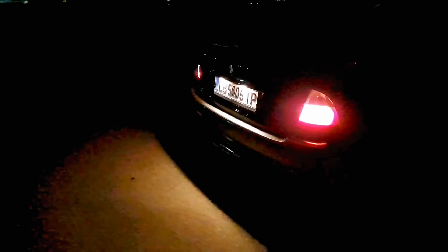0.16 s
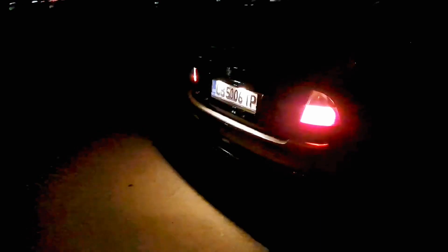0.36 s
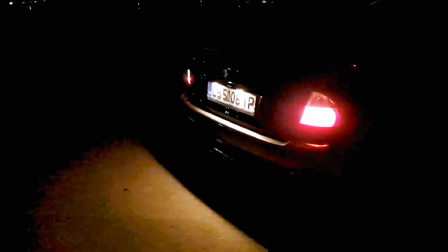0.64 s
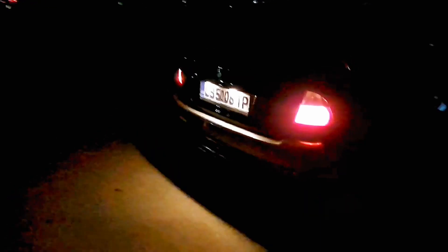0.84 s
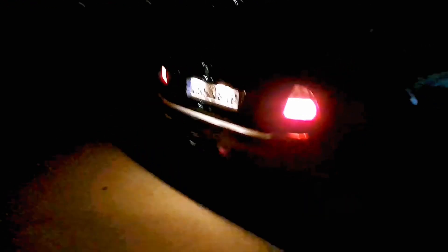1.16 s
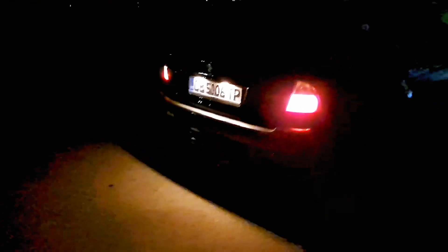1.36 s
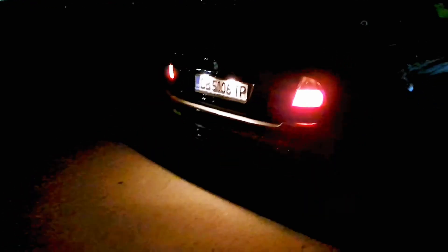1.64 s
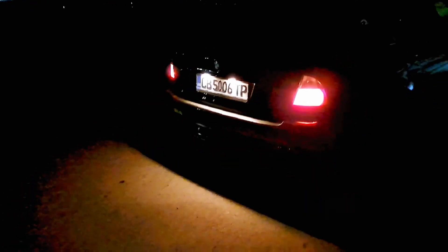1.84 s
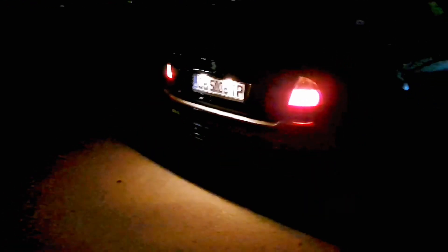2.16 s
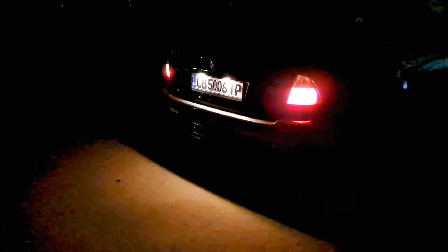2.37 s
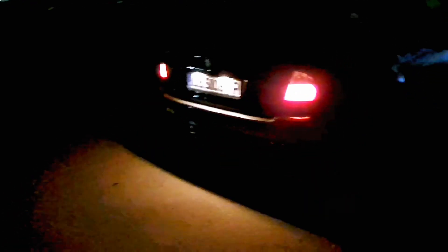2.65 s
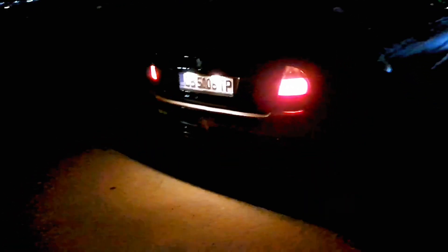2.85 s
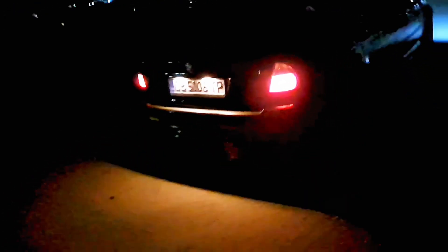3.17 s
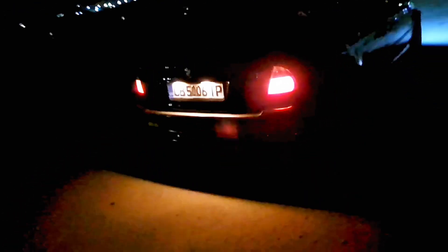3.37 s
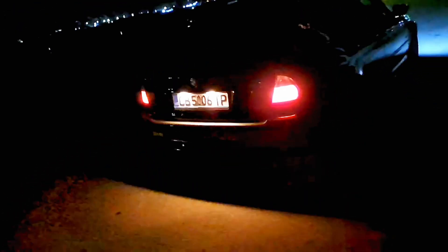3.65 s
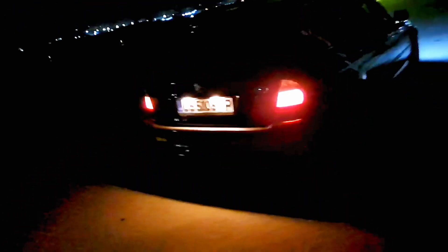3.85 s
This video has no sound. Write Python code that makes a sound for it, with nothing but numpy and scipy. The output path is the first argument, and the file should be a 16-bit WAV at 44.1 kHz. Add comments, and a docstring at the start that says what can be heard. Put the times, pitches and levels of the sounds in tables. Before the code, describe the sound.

A six-cylinder car revs and drops at its tailpipe, with loud paired backfire bangs between throaty growls

```python
"""Six-cylinder car backfiring at its tailpipe

The revs sink, are blipped up to a stuttering limiter and sink again; on each fall unburnt fuel explodes
in sharp bangs. Sines locked to the crank make the engine, and noise shaped by the pipe its rumble.
Bangs and misfires ring decaying pipe modes, with bursts of noise for cracks, sizzle and spits.
Filtered noise that throbs with the firings is gas hissing from the pipe; walls echo the explosions faintly."""
import sys
import numpy as np
from scipy import signal
from scipy.fft import rfft, irfft
from scipy.io import wavfile
from scipy.ndimage import uniform_filter1d

SR = 44100
rng = np.random.default_rng(int(sys.argv[2]) if len(sys.argv) > 2 else 0)


def log_audio(samples):
    """Write samples as a 16-bit WAV file to the path given in sys.argv[1]."""
    # one column per channel
    frames = np.atleast_2d(samples).T
    # limit to full scale, then quantise
    limited = np.clip(frames, -1, 1)
    pcm = np.round(limited * 32767).astype(np.int16)
    wavfile.write(sys.argv[1], SR, pcm)


N = 176400
TIME = np.arange(N) / SR
BINS_HZ = np.maximum(np.arange(N // 2 + 1) * SR / N, 1)

# misfires at the rev limiter, each a gap in the firing that ends in a thud:
# (time [s], thud level [dB], gap before it [s])
MISFIRES = [(1.744,-16.5,0.0024),(1.792,-18,0.04),(1.84,-12.5,0.0086),(1.893,-14,0.033),(1.948,-17,0.04695),(1.99,-12,0.011),(2.082,-9.5,.027),(2.159,-15,0.036),(2.243,-9.5,0.0185),(2.281,-7.5,0.035),(2.663,-8,0.0388),(2.765,-17,0.011)]
PORT_LAG_S, DIFFUSE_SHARE = 0.00018, 0.73  # later arrival at the right port; scattered share of noise power
TAIL_DB = -16  # faint tail of cracks and spits, relative to their onset


def from_db(db):
    """Amplitude ratio from decibels: 20 dB is a factor of ten."""
    return 10 ** (np.asarray(db) / 20)


def rms_one(x):
    """Normalization: equal mean power, here unit rms."""
    return x / np.sqrt(np.mean(x ** 2) + 1e-20)


def in_time(rows):
    """Linear interpolation: each column of a time curve at every sample."""
    s, *columns = np.transpose(rows)
    return [np.interp(TIME, s, column) for column in columns]


def gain_at(points, hz):
    """Frequency response: decibels interpolated over log frequency, returned as gain."""
    at_hz, db = np.transpose(points)
    return from_db(np.interp(np.log(hz), np.log(at_hz), db))


def colour(x, gain):
    """Linear filtering: the spectrum is multiplied by a gain per frequency."""
    return irfft(rfft(x) * gain, N)


def drift(rate_hz):
    """Low-passed random process: white noise through two equal poles at rate_hz, scaled to unit rms."""
    step = 40  # samples between computed values
    pole = np.exp(-2 * np.pi * rate_hz * step / SR)
    settling = 2000
    white = rng.standard_normal(N // step + settling + 2)
    slow = signal.lfilter([1], [1, -2 * pole, pole * pole], white)[settling:]
    return np.interp(np.arange(N) / step, np.arange(len(slow)), rms_one(slow))


def delayed(x, s):
    """Propagation delay: the same waveform s seconds later."""
    return np.interp(TIME - s, TIME, x, left=0)


def at_ports(x):
    """Arrival-time difference: direct sound reaches the left port first."""
    return np.array([x, delayed(x, PORT_LAG_S)])


def spread(three):
    """Partial coherence: one noise reaches both ports directly, two more are scatter from ground and body."""
    direct = np.array([three[0], np.roll(three[0], int(PORT_LAG_S * SR))])
    return np.sqrt(1 - DIFFUSE_SHARE) * direct + np.sqrt(DIFFUSE_SHARE) * three[1:]


def dying(age, t60):
    """Exponential decay: 60 dB down after t60 seconds, level before age zero."""
    return np.exp(-np.log(1000) * np.maximum(age, 0) / t60)


def ring(hits, modes, vary_db):
    """Modal resonance: each hit (s, dB) pushes, then pulls every mode, with a random strength per mode."""
    swing_s = 0.0015  # from push to pull
    s, db, *_ = np.transpose(hits)
    strengths = rng.standard_normal((len(s), len(modes))).T
    out = np.zeros(N)
    for (hz, mode_db, t60), chance in zip(modes, strengths):
        clicks = np.full(N, 1e-18)  # a tiny floor keeps the filter's numbers normal
        clicks[(s * SR).astype(int)] = from_db(db + mode_db + vary_db * chance)
        radius, angle = from_db(-60 / (t60 * SR)), 2 * np.pi * hz / SR
        resonator = [1, -2 * radius * np.cos(angle), radius * radius]
        out += signal.lfilter([0, np.sin(angle)], resonator, clicks)
    return out - delayed(out, swing_s)


def ragged(axis, step, depth_db, size):
    """Random modulation: gains drawn in decibels at every step along time or frequency."""
    knots = rng.standard_normal(size // 16)
    wander = np.interp(axis / step, np.arange(len(knots)), knots)
    return from_db(depth_db * np.clip(wander, -2, 2))


def bursts(hits, spectrum, tail_db, size=16384):
    """Turbulent jets (s, dB, tilt dB per octave, hold s): noise with a fast rise, hold, fall and faint tail."""
    rise_s, fall_t60_s, tail_t60_s = 0.00071, 0.052, 0.37
    ripple_hz, ripple_db = 130, 5  # unevenness of each jet's spectrum
    crackle_s, crackle_db = .0012, 3.5  # unevenness in time
    age, hz = np.arange(size) / SR, np.maximum(np.arange(size // 2 + 1) * SR / size, 1)
    tint = gain_at(spectrum, hz)
    octaves = np.log2(np.clip(hz, 800, 6000))
    tail = from_db(tail_db) * dying(age, tail_t60_s)
    out = np.zeros((2, N + size))
    for s, db, tilt_db, hold in hits:
        own = from_db(tilt_db * octaves) * ragged(hz, ripple_hz, ripple_db, size)
        white = spread(rng.standard_normal((3, size)))
        noise = rms_one(irfft(rfft(white) * tint * own))
        shape = np.minimum(age / rise_s, 1) * (dying(age - hold, fall_t60_s) + tail)
        shape = shape * ragged(age, crackle_s, crackle_db, size)
        start = int(s * SR)
        out[:, start:start + size] += from_db(db) * shape * noise
    return out[:, :N]


def engine(speed, turns, cut):
    """Harmonic orders: three firings per turn and their octave, over a burble of other crank orders."""
    # level of the firing tone: (time [s], level [dB])
    firing_level = [(.04,-20.5),(.3,-23),(.74,-29.5),(.85,-64),(1.15,-31),(1.3,-38),(1.5,-29.5),(1.7,-24.5),(1.95,-21.5),(2.17,-11.5),(2.35,-15),(2.39,-30.5),(2.52,-21.5),(2.58,-14.5),(2.64,-17),(2.78,-21),(2.85,-13.5),(3.1,-20),(3.3,-25.5),(3.63,-26.5),(3.73,-42),(4,-54)]
    # level of its octave: (time [s], level [dB])
    octave_level = [(.04,-27),(.74,-25),(.85,-62),(1.122,-47),(1.24,-20.5),(1.42,-24),(1.5,-15.5),(1.72,-18.5),(1.85,-29.5),(2,-17),(2.4,-15.5),(2.49,-19.5),(2.58,-13),(2.68,-18.5),(2.9,-28.5),(3.1,-22.5),(3.63,-25.5),(3.73,-44),(4,-30)]
    # level of the burble from uneven cylinders: (time [s], level [dB])
    burble_level = [(.04,1.5),(.75,-2.5),(.86,-8.5),(1.15,-4),(1.3,-3),(1.7,-3.5),(2.2,3.5),(2.45,2),(2.9,-2),(3.3,2),(3.63,0.5),(3.73,-9),(4,-8.5)]
    # the burble's tones: (multiple of crank speed, level [dB])
    burble_orders = [(2,-34),(4,-40),(7,-36.5),(8,-30.5),(9,-28),(10,-33),(11,-40),(12,-28.5),(14,-34),(15,-31.5),(18,-27.5)]
    # response of the exhaust pipe: (frequency [Hz], gain [dB])
    pipe = [(20,-23),(45,-1.5),(66,5),(90,-7),(110,1.5),(142,3),(200,-5),(260,-5.5),(325,2),(385,-5),(450,-12),(540,-16.5),(750,-28.5),(1500,-63)]
    # low turbulence in the pipe: (time [s], level [dB])
    rumble_level = [(0,-35),(.75,-30),(.9,-38),(1.7,-34.5),(1.76,-28),(2.3,-23),(2.44,-28.5),(2.52,-28.5),(2.7,-22.5),(2.86,-36.5),(3.6,-37.5),(4,-33)]
    half_orders_db, gap_tone_db = -68, -8.5
    tone_waver_db, burble_waver_db = 1.36, 2.5  # rms level waver

    def tone(order, waver_db):
        """Phase locking: a sine at a multiple of the crank angle, wavering in level."""
        return np.sin(2 * np.pi * (order * turns + rng.random())) * from_db(waver_db * drift(9.1))

    firing = from_db(in_time(firing_level)[0]) * tone(3, tone_waver_db)
    firing = firing + from_db(in_time(octave_level)[0]) * tone(6, tone_waver_db)
    firing = firing * from_db(gap_tone_db * cut)
    orders = [(round(order), db) for order, db in burble_orders]
    orders += [(k + .5, half_orders_db) for k in range(1, 14)]
    burble = np.zeros(N)
    for order, db in orders:
        burble += from_db(db) * gain_at(pipe, order * speed) * tone(order, burble_waver_db)
    rumble = rms_one(colour(rng.standard_normal(N), gain_at(pipe, BINS_HZ)))
    burble = from_db(in_time(burble_level)[0]) * burble
    return at_ports(firing + burble + from_db(in_time(rumble_level)[0]) * rumble)


def limiter():
    """Interrupted excitation: how far the spark is cut (0-1), and the phase slip in turns after each gap."""
    edge_s, slip_turns = .008, .026  # smoothing of the edges; spread of the slip before smoothing
    cut, slip = np.zeros(N), np.zeros(N)
    for (s, _, gap), chance in zip(MISFIRES, rng.standard_normal(len(MISFIRES))):
        cut[(TIME > s - gap) & (TIME < s)] = 1
        slip[TIME > s] = slip_turns * chance
    return uniform_filter1d(np.array([cut, slip]), int(edge_s * SR))


def bangs():
    """Impulsive source: exploding fuel swings the pressure, rings the pipe, cracks and sizzles at the outlet."""
    # bangs: (time [s], thump level [dB], thump pitch [Hz], crack delay [s], crack level [dB],
    # sizzle level [dB], crack tilt [dB per octave], hold of crack and sizzle [s])
    explosions = [(.7628,0.5,268,0.0019,-14,-24.5,0.5,0.0014),(0.8207,-5,295,-0.0078,-23.5,-50,-0.5,0.0038),(1.0237,2.5,223,0,-20.5,-33.5,-2,0.0022),(1.0643,1,193,-0.0016,-24.5,-30.5,-1,0.0052),(1.139,-10,149,-.001,-42,-50,2,0.0073),(3.6391,0.5,247,.0035,-11,-30,-0.5,0.0017),(3.695,-13,270,-.0079,-24.5,-46,1.5,0.005),(3.9149,3,205.5,0.0014,-17.5,-36,-3,0.0071)]
    # the pipe's ring after a bang: (frequency [Hz], level [dB], t60 [s])
    pipe_modes = [(48.4,-12,0.14),(69.7,-10.5,0.09),(123,-13.5,0.045),(305.6,-17.5,0.042),(516,-26.5,0.039),(1032,-30.5,0.022)]
    # relative spectrum of the crack: (frequency [Hz], density [dB per Hz])
    crack_spectrum = [(300,12),(600,-1.5),(780,-5.5),(1100,3.5),(1700,-2.5),(3000,-8),(4600,-11),(5800,-15),(9000,-27),(16000,-26)]
    # relative spectrum of the sizzle: (frequency [Hz], density [dB per Hz])
    sizzle_spectrum = [(4000,-15),(8500,-7),(11500,-0.5),(15500,2.5)]
    thump_t60_s, thump_rise_s, sizzle_tail_db = 0.026, 0.0032, -24
    thumps = ring(explosions, pipe_modes, vary_db=0.5)
    cracks, sizzles = [], []
    for s, thump_db, hz, lag, crack_db, sizzle_db, tilt_db, hold in explosions:
        age = np.maximum(TIME - s, 0)
        envelope = dying(age, thump_t60_s) * (1 - np.exp(-age / thump_rise_s))
        thumps += from_db(thump_db) * np.sin(2 * np.pi * hz * age) * envelope
        cracks.append((s + lag, crack_db, tilt_db, hold))
        sizzles.append((s + lag, sizzle_db, 0, hold))
    crack = bursts(cracks, crack_spectrum, TAIL_DB)
    sizzle = bursts(sizzles, sizzle_spectrum, sizzle_tail_db)
    return at_ports(thumps) + crack + sizzle


def misfires():
    """Damped resonance: small charges deep in the silencer thud dully; a few reach the outlet and spit."""
    # the pipe's ring after a misfire: (frequency [Hz], level [dB], t60 [s])
    thud_modes = [(68,3,0.19),(112,-2.5,0.07),(184,-7,0.11),(262,-15,0.041),(400,-20,.045)]
    # burning fuel spits from the outlet: (time [s], level [dB], hold [s])
    spits = [(1.823,-42,0.0077),(1.955,-33.5,0.023),(2.214,-34,0.011),(2.289,-34,0.0095)]
    # relative spectrum of a spit: (frequency [Hz], density [dB per Hz])
    spit_spectrum = [(1200,5),(4500,-12),(8500,-23),(13000,-15)]
    spit = bursts([(s, db, 0, hold) for s, db, hold in spits], spit_spectrum, TAIL_DB)
    return at_ports(ring(MISFIRES, thud_modes, vary_db=0.4)) + spit


def cycle_grit(size):
    """Periodic noise: three noises one engine cycle long, in which some overtones stand out."""
    uneven_db = 4.0
    overtones = rfft(rng.standard_normal((3, size)))
    chance = np.clip(rng.standard_normal(size // 2 + 1), -2, 2)
    return irfft(overtones * from_db(uneven_db * chance))


def gas_hiss(turns, size=2048):
    """Modulated jet noise: hiss throbs with the firings, and part repeats every two-turn engine cycle."""
    # gas rushing from the tailpipe: (time [s], level [dB], top-octave gain [dB])
    flow = [(.04,-35.5,5.5),(.4,-38,6),(.75,-41,3.5),(.9,-49.5,-2),(1.2,-51.5,1),(1.35,-44,7),(1.7,-36.5,2.5),(1.9,-37.5,2.5),(2.3,-31.5,2),(2.55,-31.5,.5),(2.85,-34,-4),(3.3,-39,-.5),(3.62,-38.5,-1.5),(3.8,-50,-12),(4,-47.5,0)]
    # relative spectrum of the hiss: (frequency [Hz], density [dB per Hz])
    hiss_spectrum = [(560,-2.5),(760,-9.5),(1000,-4),(1300,-5.5),(1700,-9.5),(2400,-11),(3300,-15.5),(5100,-20.5),(5600,-25.5),(8800,-34),(11500,-27.5),(15500,-28.5)]
    low_hz, top_hz = 500, 8700  # lower roll-off; start of the top octave
    rasp_share, throb_depth, sputter_db = .58, 0.024, .7  # share of power that repeats; depth; rms waver
    flow_db, top_db = in_time(flow)
    place = turns / 2 % 1 * size
    cycle = rms_one(np.array([np.interp(place, np.arange(size), grit) for grit in cycle_grit(size)]))
    fresh = rng.standard_normal((3, N))
    noise = spread(np.sqrt(rasp_share) * cycle + np.sqrt(1 - rasp_share) * fresh)
    noise = rms_one(colour(noise, gain_at(hiss_spectrum, BINS_HZ) / (1 + (low_hz / BINS_HZ) ** 4)))
    top = colour(noise, 1 / (1 + (top_hz / BINS_HZ) ** 6))
    throb = 1 + throb_depth * np.sin(2 * np.pi * 3 * turns)
    level = from_db(flow_db + sputter_db * drift(85))
    return level * throb * (noise + (from_db(top_db) - 1) * top)


def walls(x):
    """Discrete reflection: a few delayed, low-passed copies return from alternating sides."""
    # reflections: (delay [s], level [dB])
    echoes = [(.021,-29),(.034,-27),(.087,-28)]
    low_pass = signal.butter(2, 3100, fs=SR, output="sos")
    dull = signal.sosfilt(low_pass, x.mean(axis=0))
    out = np.zeros((2, N))
    for k, (s, db) in enumerate(echoes):
        out[k % 2] += from_db(db) * delayed(dull, s)
    return out


def scene():
    """Superposition: engine speed drives tones and hiss; explosions and their echoes lie on top."""
    # crankshaft speed: (time [s], speed [turns per second])
    crank_speed = [(0,43.4),(.25,41.8),(.5,37.7),(.75,34.5),(1.14,28.6),(1.22,29.1),(1.3,31),(1.5,43.4),(1.65,52.2),(1.75,55.5),(2.3,55.1),(2.48,54.2),(2.75,50.6),(3,45.7),(3.25,41.4),(3.6,37.1),(4,30.9)]
    jitter, gap_hiss_db = .002, -0.5  # rms share of the speed; hiss level while the spark is cut
    speed = in_time(crank_speed)[0] * (1 + jitter * drift(15))
    turns = np.cumsum(speed) / SR
    explosions = bangs() + misfires()
    cut, slip = limiter()
    hiss = from_db(gap_hiss_db * cut) * gas_hiss(turns)
    return engine(speed, turns + slip, cut) + hiss + explosions + walls(explosions)


def record(dry):
    """Band limiting and clipping: each port has its own colour and bass loss; the first instant is silent."""
    # left minus right port: (frequency [Hz], level difference [dB])
    tilt = [(60,-2),(140,0),(320,-4),(600,-6.5),(1200,-2),(2200,-3.5),(4500,-12.5),(6500,3.5),(8500,6.5),(14000,5.5)]
    start_s, top_cut_hz = .035, 15750
    lean = np.sqrt(gain_at(tilt, BINS_HZ))  # half the difference to each port
    left, right = colour(dry, np.array([lean, 1 / lean]))
    left = signal.sosfilt(signal.butter(1, 17.5, "high", fs=SR, output="sos"), left)
    right = signal.sosfilt(signal.butter(1, 24, "high", fs=SR, output="sos"), right)
    rumble_cut = signal.butter(2, 56.7, "high", fs=SR, output="sos")
    ports = signal.sosfilt(rumble_cut, np.array([left, right]))
    heard = np.clip(ports * (TIME > start_s), -1, 1)
    return signal.sosfilt(signal.ellip(10, .1, 80, top_cut_hz, fs=SR, output="sos"), heard)


dry = scene()
out = record(dry)
log_audio(out)
```